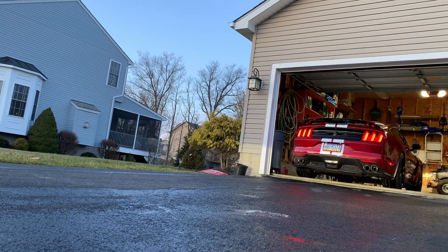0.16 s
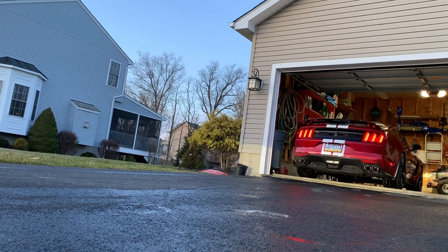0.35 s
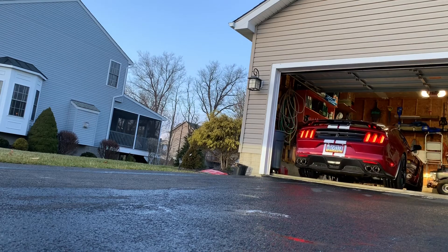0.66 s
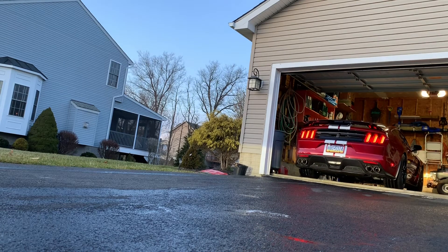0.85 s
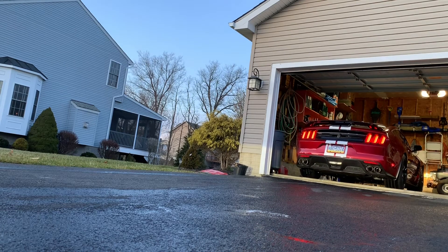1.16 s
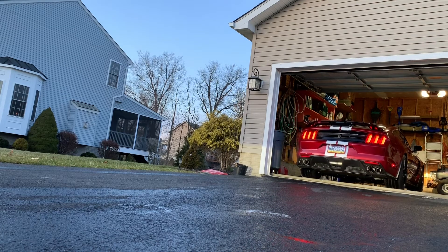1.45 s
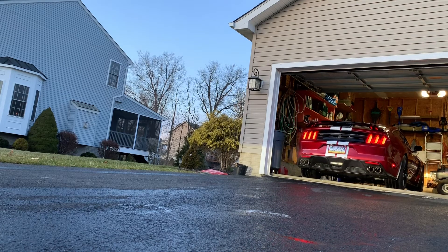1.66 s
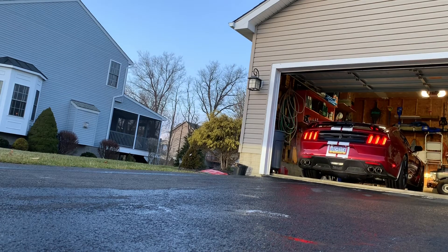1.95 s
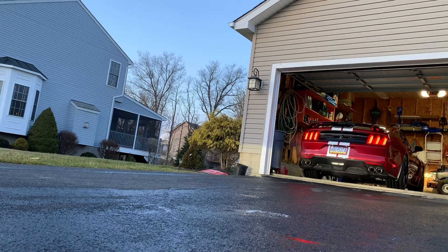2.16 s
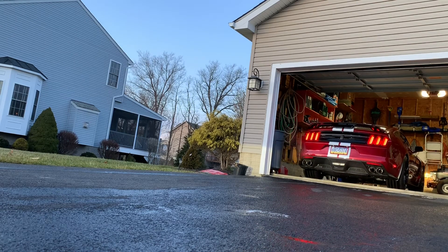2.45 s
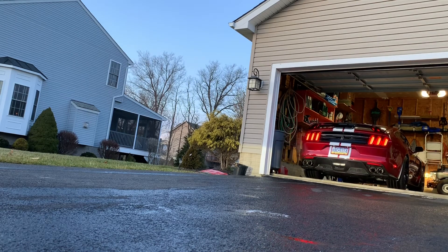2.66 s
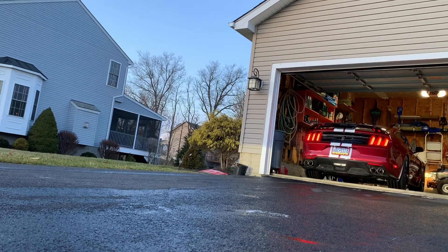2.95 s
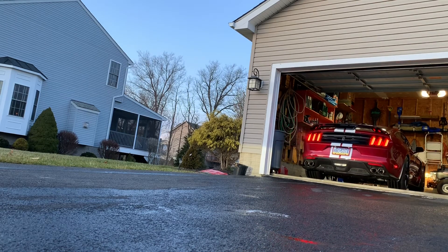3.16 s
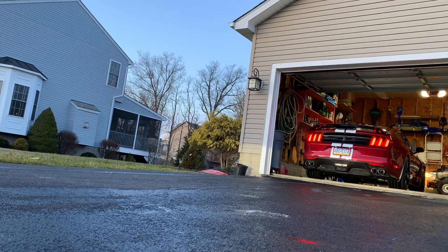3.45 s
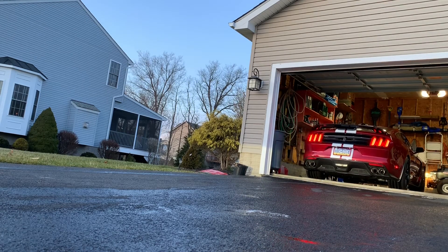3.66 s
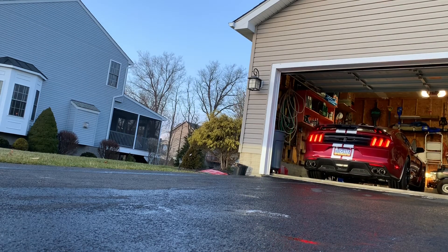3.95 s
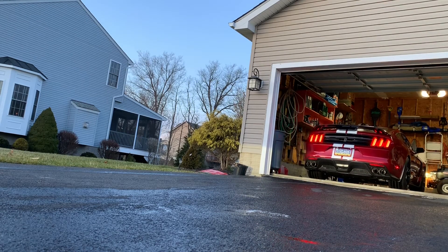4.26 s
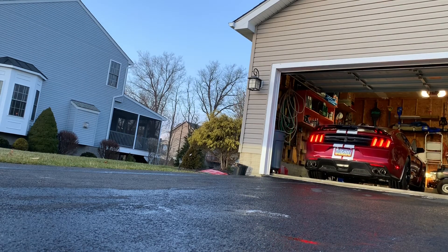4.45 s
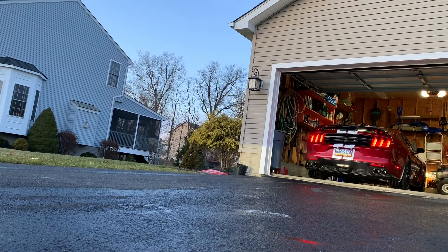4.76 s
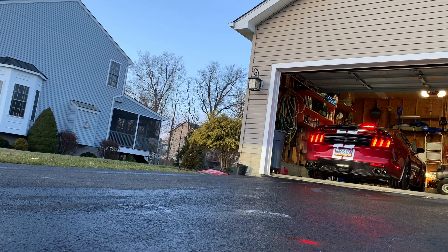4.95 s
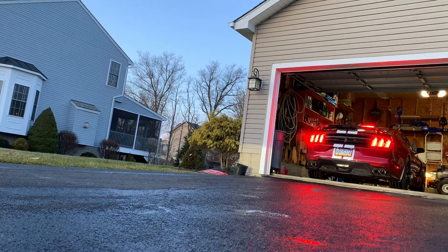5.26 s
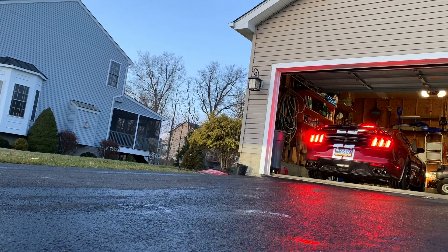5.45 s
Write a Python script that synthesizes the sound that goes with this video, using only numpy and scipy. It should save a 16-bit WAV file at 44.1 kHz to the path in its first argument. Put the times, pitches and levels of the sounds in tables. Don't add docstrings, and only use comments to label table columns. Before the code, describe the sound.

Booming, uneven exhaust resonates in a residential garage, picked up in stereo by a phone outside. The engine sinks from higher revs, surges twice with raspy gas, buzzing trim and crackling late burns, then falls into a throaty idle. A slight lift with one more pop follows. Steady fan and belt hiss and rapid valve ticking grow a little louder.

```python
import sys
import numpy as np
from scipy import signal
from scipy.fft import rfft, irfft, next_fast_len
from scipy.io import wavfile
from scipy.ndimage import uniform_filter1d

SR = 44100
rng = np.random.default_rng(int(sys.argv[2]) if len(sys.argv) > 2 else 0)


def gain_from_db(level_db):
    decades = np.asarray(level_db, float) / 20
    return 10 ** decades


def persist_wave(psi):
    counts = np.round(np.clip(psi, -1, 1) * 32767).astype(np.int16)
    wavfile.write(sys.argv[1], SR, np.atleast_2d(counts).T)


N = 246519
SIZE = next_fast_len(N + SR)
HZ = np.arange(SIZE // 2 + 1) * SR / SIZE
TIME = np.arange(N) / SR
DIRECT_ONLY = np.array([[-1], [0]])


def unit(x):
    return x / np.sqrt(np.mean(x ** 2))


def curve(table):
    return np.interp(TIME, *np.transpose(table))


def shape(points):
    hz, value = np.transpose(points)
    return np.interp(np.log(HZ + 1), np.log(hz), value)


def resonance(hz, width_hz):
    damping = 1j * width_hz * HZ
    return damping / (hz ** 2 - HZ ** 2 + damping)


def resonances(modes):
    total = sum(gain_from_db(db) * resonance(hz, width_hz) for hz, width_hz, db in modes)
    low, high = 0.88 * modes[0][0], 0.88 * modes[-1][0]
    return total / (1 + (low / (HZ + 1)) ** 8) / (1 + (HZ / high) ** 6)


def through(x, response):
    return unit(irfft(rfft(x, SIZE) * response, SIZE)[..., :N])


def pulses(at, size):
    at = np.clip(at, 0, N - 2)
    i = at.astype(int)
    late = at - i
    return np.bincount(i, size * (1 - late), N) + np.bincount(i + 1, size * late, N)


def puffs(clicks, decay_s):
    return signal.lfilter([1], [1, -np.exp(-1 / (decay_s * SR))], clicks)


def noise():
    return rng.standard_normal((2, N))


def scattered(x, t60_s):
    t = np.arange(SR // 2) / SR
    tail = rfft(rng.standard_normal((2, len(t))) * gain_from_db(-60 * t / t60_s), SIZE)
    return through(x, tail / np.abs(tail) ** .85)


def nearness():
    rolls_from_s, nears_db_per_s = 0.81, 2
    return nears_db_per_s * np.clip(TIME - rolls_from_s, 0, None)


def follows(full_db, throttle_share, near_share):
    # start_s, throttle_db under a full blip
    throttle = [(0, -12), (.14, -14), (.44, -19.5), (.97, -24.5), (1.31, -14), (1.52, 2), (1.94, -14.5),
                (2.21, -5.5), (2.54, -6), (2.59, -11.5), (2.68, -5.5), (2.99, -18.5), (3.63, -21),
                (3.77, -15.5), (4.0, -13), (4.14, -6.5), (4.56, -14), (4.72, -10)]
    return full_db + throttle_share * curve(throttle) + near_share * nearness()


def crank():
    # start_s, firing_rate_hz
    speed = [(0.01, 75.6), (.07, 71.1), (.36, 61.36), (.58, 53.52), (1.01, 48.27), (1.12, 51.68),
             (1.31, 56.72), (1.51, 73.32), (1.77, 65.75), (2.2, 71.7), (2.48, 71.68), (2.84, 55.75),
             (3.16, 51.1), (3.39, 46.14), (3.86, 45.9), (4.14, 50.16), (4.5, 47.29), (5.16, 49.48)]
    hz = curve(speed)
    return hz, np.cumsum(hz) / SR


def cylinders(hz, turns):
    # strength_db, delay in firing gaps
    firing_order = [(3, .035), (-1, .035), (-3.5, -.035), (1, -.035), (1, -.035), (1, .105), (-1.5, .035),
                    (-1, -.105)]
    count = int(turns[-1])
    timing, strength, edge_timing, edge_strength = rng.standard_normal((4, count))
    strength_db, delay = np.resize(np.array(firing_order), (count, 2)).T
    at = np.interp(np.arange(count) + delay + .011 * timing, turns, np.arange(N))
    size = gain_from_db(strength_db + .9 * strength)
    gap = SR / np.interp(at, np.arange(N), hz)
    edges = pulses(at + .007 * edge_timing * gap, size * gain_from_db(1.3 * edge_strength))
    return at, size, edges


def garage_boom(turns):
    # mode_hz, width_hz, level_db at full throttle, share of throttle
    air_modes = [(50.88, 2.34, -14.5, 0.85), (54.73, 2.9, -7.5, 0.93), (70.3, 8.7, -23.5, 1.1)]
    polarity = [-1, 1, 1]
    tone = np.sqrt(2) * np.cos(2 * np.pi * turns - .5)
    heard = 0
    for sign, (hz, width_hz, db, share) in zip(polarity, air_modes):
        driven = gain_from_db(follows(db, share, near_share=0.33)) * tone
        heard = heard + sign * rfft(driven, SIZE) * resonance(hz, width_hz)
    return DIRECT_ONLY * irfft(heard, SIZE)[:N]


def lope(hz, at, size):
    # mode_hz, width_hz, level_db
    lope_modes = [(47.5, 3.9, -7), (65.3, 3.3, 4.5), (79, 69, 11)]
    uneven = through(pulses(at, size - size.mean()), resonances(lope_modes))
    slow = np.clip(48 - hz, 0, 4)
    return DIRECT_ONLY * gain_from_db(follows(-40, 0.19, 0.43) + 2.2 * slow) * uneven


def pipes(hz, turns, firings):
    # mode_hz, width_hz, level_db
    pipe_modes = [(132.7, 7.1, 6.5), (144.5, 6.7, -1.5), (148, 8.5, -15.5), (175.4, 42, -2.5),
                  (204.4, 42, -18.5)]
    # firing_rate_hz, level_db under the pipes
    octave_level = [(44, -5.5), (49, -12), (53, -36)]
    ring = scattered(through(firings, resonances(pipe_modes)), t60_s=.1)
    octave_db = np.interp(hz, *np.transpose(octave_level))
    octave = gain_from_db(octave_db) * np.sqrt(2) * np.cos(4 * np.pi * turns)
    return gain_from_db(follows(-31, 0.92, 0.89)) * (ring + DIRECT_ONLY * octave)


def bark(edges):
    # mode_hz, width_hz, level_db
    bark_modes = [(230.5, 26, 1), (264.4, 26, 1.5), (292.9, 12, 3), (340, 19, -1.5), (362.8, 24, 0.5),
                  (353, 78, -19.5), (445, 100, -3)]
    return gain_from_db(follows(-42, 0.49, 0.83)) * scattered(through(edges, resonances(bark_modes)), t60_s=0.22)


def manifold_branch(turns, edges):
    # mode_hz, width_hz, level_db
    branch_modes = [(333.6, 48, -9), (357.7, 13.3, -2.5), (616.4, 28, -10.5), (706, 42, -25.5)]
    swing_db = 4.5 * np.cos(2 * np.pi * (turns / 8 - 0.31))
    ring = through(gain_from_db(swing_db) * edges, resonances(branch_modes))
    return gain_from_db(follows(-45.5, 0.48, 0.66)) * scattered(ring, t60_s=0.088)


def tail_gas(hz, firings, edges):
    # mode_hz, width_hz, level_db
    rasp_modes = [(480, 2.2, -2.5), (462, 63, -2.5), (608, 87, -8.5), (692, 40, -14.5), (789, 37, 0.5),
                  (923, 130, -8), (1085, 28, 1), (1129, 23, -7.5), (1283, 110, -10.5)]
    # pitch_hz, level_db per Hz
    rush_colour = [(300, -46.5), (430, -15), (620, -7), (800, -15.5), (1050, -14), (1300, -8), (1700, -43)]
    rasp = scattered(through(edges, resonances(rasp_modes)), t60_s=.3)
    rush = through((.9 + puffs(firings, decay_s=.008)) * noise(), gain_from_db(shape(rush_colour)))
    level_db = follows(-45.5, 0.86, 0.31) + late_burns() + 0.54 * (hz - hz.max())
    return gain_from_db(level_db) * (gain_from_db(-2.0) * rasp + gain_from_db(-4.5) * rush)


def trim_panel(hz, at):
    # pitch_hz, level_db per Hz
    buzz_colour = [(8000, -35), (9800, 0.5), (11500, 1), (13000, -0.5), (15000, 1.5), (16000, -21.5)]
    knocks = pulses(at, gain_from_db(3.7 * rng.standard_normal(len(at))))
    buzz = through((0.33 + puffs(knocks, decay_s=.003)) * noise(), gain_from_db(shape(buzz_colour)))
    shake_db = follows(-72.5, 2.5, .05) + 1.5 * late_burns() + 0.05 * (hz - hz.max())
    rest_db = -89.5
    return (gain_from_db(shake_db) + gain_from_db(rest_db)) * buzz


def exhaust():
    hz, turns = crank()
    at, size, edges = cylinders(hz, turns)
    firings = pulses(at, size)
    low = garage_boom(turns) + lope(hz, at, size) + pipes(hz, turns, firings)
    middle = bark(edges) + manifold_branch(turns, edges)
    return low + middle + tail_gas(hz, firings, edges) + trim_panel(hz, at)


def bay_hiss():
    # pitch_hz, level_db per Hz
    hiss_colour = [(300, -1), (700, 8), (1350, 2), (1620, -2), (2000, 1), (2700, -6.5), (3200, -2),
                   (4200, -10), (5000, -10.5), (6300, -17), (7500, -22.5), (9000, -27.5), (16000, -33)]
    # mode_hz, width_hz, level_db
    whine_modes = [(1614, 180, -3.5), (1643, 32, 9), (2260, 170, -10.5), (2562, 32, 5), (4370, 45, -8.5)]
    steps = np.repeat(rng.standard_normal(N // 3000 + 1), 3000)
    flicker = unit(uniform_filter1d(steps, 3000)[:N])
    colour = gain_from_db(shape(hiss_colour)) * np.abs(1 + 1.27 * resonances(whine_modes))
    return through(gain_from_db(0.62 * flicker) * noise(), colour)


def valve():
    # mode_hz, width_hz, level_db
    valve_modes = [(4200, 420, -10.5), (6130, 2600, -19.5), (7030, 330, -4), (7064, 13, 1)]
    rate_hz, start_s = 33.2, .0195
    count = int(rate_hz * N / SR)
    timing, strength = rng.standard_normal((2, count))
    at = (start_s + np.arange(count) / rate_hz + 0.00094 * timing) * SR
    strokes = pulses(at, gain_from_db(np.resize([0, -5], count) + 1.5 * strength))
    return through(puffs(strokes, decay_s=0.024) * noise(), resonances(valve_modes))


def engine_bay():
    return gain_from_db(follows(-64, 0.036, 0.96)) * (gain_from_db(5.5) * bay_hiss() + gain_from_db(-8.5) * valve())


def late_burns():
    # start_s, level_db over the steady gas
    burns = [
        (1.644, 8),
        (2.226, -1),
        (2.676, 13.5),
        (2.815, 5),
        (4.15, 10),
    ]
    start_s, level_db = np.transpose(burns)
    return puffs(pulses(start_s * SR, level_db), decay_s=0.025)


def ports(pair):
    # pitch_hz, phase_radians
    port_phase = [(0, 0), (800, .3), (1400, 4.2), (2250, 6.3), (5200, 15.7), (6100, 18.8), (7000, 17.2),
                  (8500, 15.7), (10800, 12.6), (13500, 9.4), (15200, 6.3)]
    # pitch_hz, share (0 to 1)
    port_share = [(60, .995), (200, .975), (300, .8), (450, .25), (1100, .2), (1500, .9), (2700, .6),
                  (3200, .9), (5000, .7), (6000, .3), (7000, .9), (9000, .96), (10000, .7), (12000, .9)]
    # pitch_hz, level_db
    port_tilt = [(60, .8), (130, 1.3), (200, 1.2), (380, 1.2), (700, 1.4), (1300, -.8), (3500, .1),
                 (5800, -6.5), (7000, -2), (9000, .1)]
    direct, twin = rfft(pair, SIZE)
    share = np.clip(shape(port_share), 0, 1)
    lead = np.interp(HZ, *np.transpose(port_phase))
    side = np.array([[1], [-1]])
    both = np.sqrt((1 + share) / 2) * direct + side * np.sqrt((1 - share) / 2) * twin
    turned = both * np.exp(.5j * side * lead)
    return irfft(turned * gain_from_db(side * shape(port_tilt) / 2), SIZE)[:, :N]


def scene():
    return ports(exhaust() + engine_bay())


def roll_off(x):
    return signal.sosfilt(signal.butter(12, 17020, fs=SR, output="sos"), x)


def record(dry):
    top_cut = signal.ellip(8, .2, 60, 15700, fs=SR, output="sos")
    return roll_off(signal.sosfilt(top_cut, dry))


dry = scene()
out = record(dry)
persist_wave(out)
```